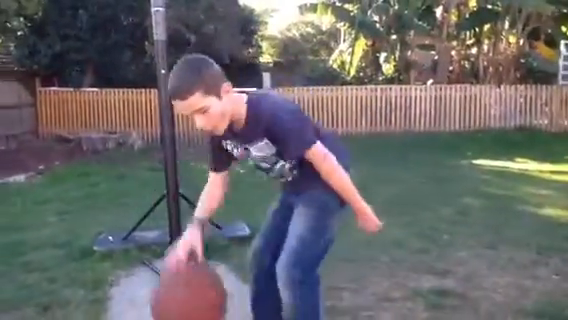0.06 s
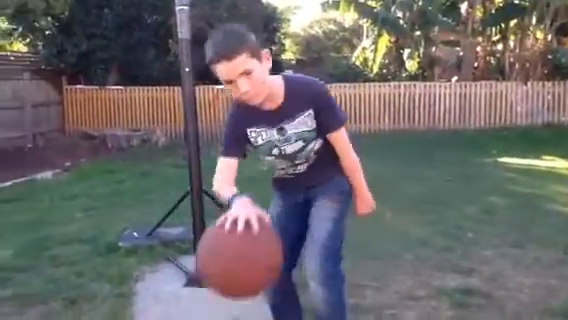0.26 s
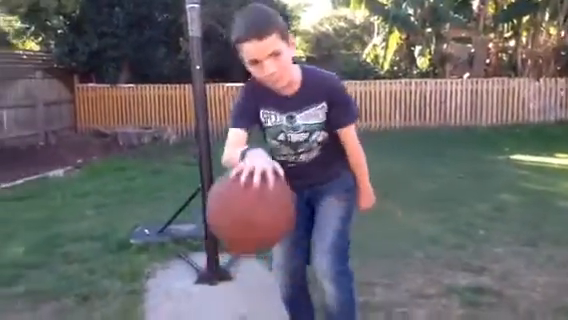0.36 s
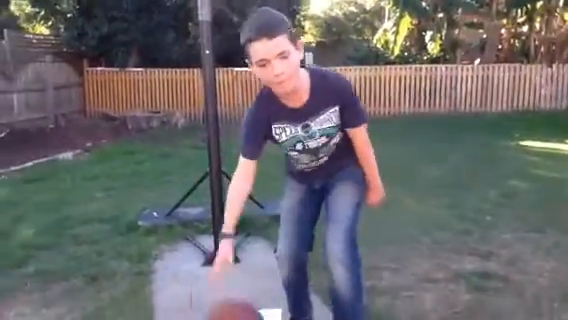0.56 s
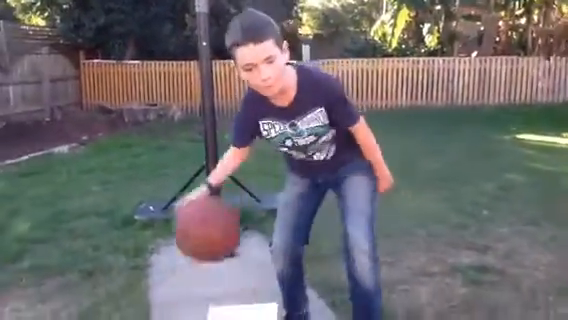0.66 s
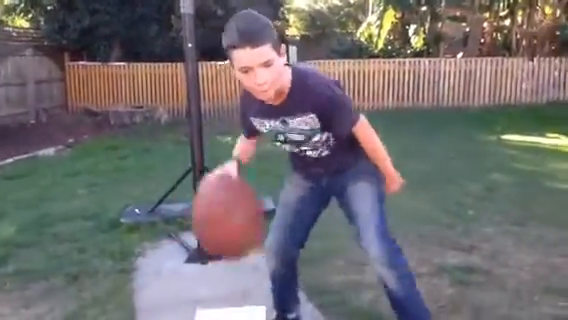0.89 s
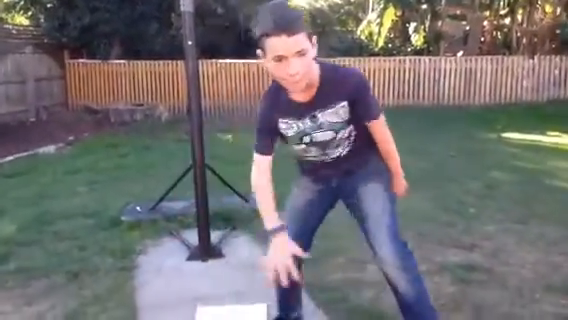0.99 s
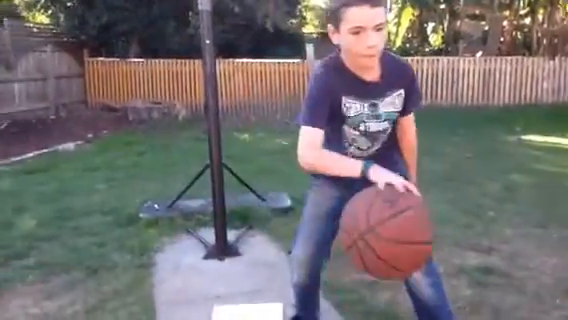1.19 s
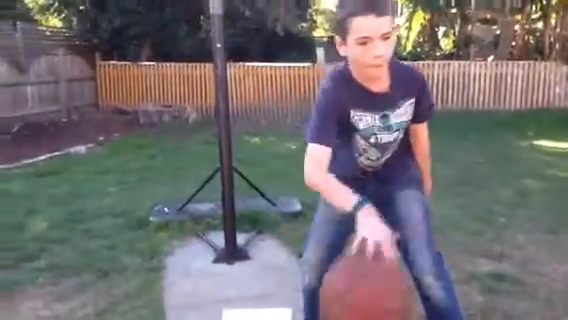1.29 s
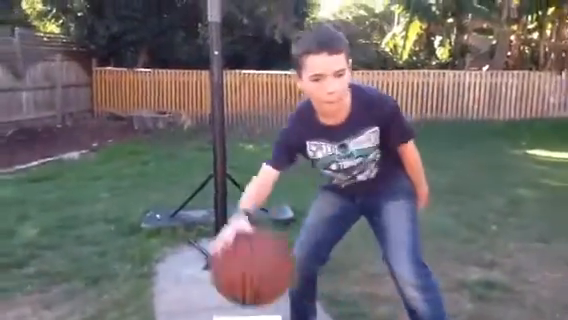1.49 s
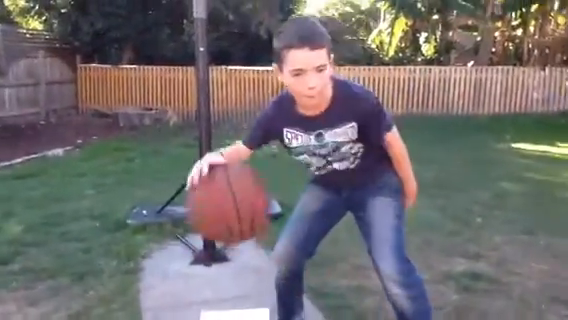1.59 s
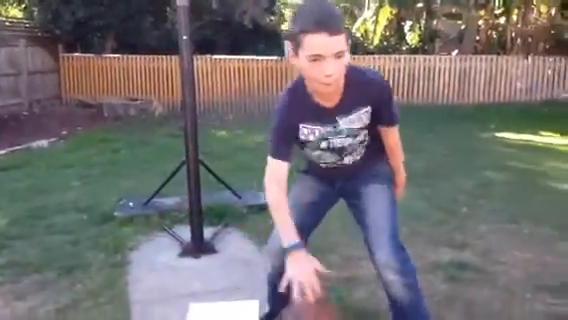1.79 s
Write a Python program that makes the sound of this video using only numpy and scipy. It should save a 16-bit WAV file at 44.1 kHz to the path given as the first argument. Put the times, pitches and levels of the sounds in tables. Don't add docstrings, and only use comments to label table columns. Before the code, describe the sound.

A basketball is dribbled close to the microphone on concrete in a garden, four slapping, hollow bounces under half a second apart, with a soft palm pat before the first and short echoes from fence and house.

```python
import sys
import numpy as np
from scipy import signal
from scipy.fft import rfft, irfft, next_fast_len
from scipy.io import wavfile
from scipy.ndimage import uniform_filter1d, map_coordinates

SR = 44100
rng = np.random.default_rng(int(sys.argv[2]) if len(sys.argv) > 2 else 0)


def log_audio(samples):
    frames = np.atleast_2d(samples).T
    limited = np.clip(frames, -1, 1)
    pcm = np.round(limited * 32767).astype(np.int16)
    wavfile.write(sys.argv[1], SR, pcm)


def gain_from_db(level_db):
    decades = np.asarray(level_db, float) / 20
    return 10 ** decades


N = 81585


def unit(x):
    return x / np.sqrt(np.mean(x ** 2) + 1e-20)


def along(points, hz):
    f, v = np.transpose(points)
    return np.interp(np.log(hz + 1), np.log(f + 1), v)


def wobble(rate_hz):
    knots = rng.standard_normal(int(N * rate_hz / SR) + 4)
    return map_coordinates(knots, [np.arange(N) * rate_hz / SR])


def filtered(x, response):
    m = next_fast_len(N + SR // 2)
    return irfft(rfft(x, m) * response(np.fft.rfftfreq(m, 1 / SR)), m)[:N]


def noise(spectrum):
    return unit(filtered(rng.standard_normal(N), lambda hz: gain_from_db(along(spectrum, hz))))


def after(start_s):
    return np.maximum(np.arange(N) / SR - start_s, 0)


def fade(t, t60_s):
    return (t > 0) * gain_from_db(-60 * t / t60_s)


def ring(t, hz, t60_s):
    return np.sin(2 * np.pi * hz * t) * fade(t, t60_s)


# freq_hz, level_db_per_hz
FLOOR = [(30, -43), (70, -18), (130, -10.5), (300, -2.5), (600, -6), (1300, -8.5), (2200, -16),
         (15500, -23.5)]
FLOOR_DB = -60.5


def traffic():
    return gain_from_db(FLOOR_DB + 1.6 * wobble(3.5)) * noise(FLOOR)


# time_s, level_db
CRICKET = [(0, -84), (.2, -75), (.35, -70), (.58, -74.5), (.72, -62), (.9, -72.5), (1.1, -82.5), (1.5, -72),
           (1.85, -75)]
CRICKET_HZ, CRICKET_WIDTH_HZ, CRICKET_SWING_DB = 2860, 20, 4


def cricket():
    t = np.arange(N) / SR
    level_db = np.interp(t, *np.transpose(CRICKET)) + CRICKET_SWING_DB * wobble(45)
    drift_cycles = np.cumsum(CRICKET_WIDTH_HZ * wobble(40)) / SR
    return np.sqrt(2) * np.sin(2 * np.pi * (CRICKET_HZ * t + drift_cycles)) * gain_from_db(level_db)


# freq_hz, level_db_per_hz
TICK_COLOUR = [(1500, -19), (3000, -6), (7000, -2.5), (13000, -11), (16000, -17)]
# start_s, peak_db, pitch_hz
TICKS = [(.832, -41, 4800), (.850, -55, 4300), (.8995, -53, 4600), (1.555, -51, 8000), (1.5689, -41, 5000),
         (1.7151, -50, 5500)]
TICK_DB, TICK_T60_S, TICK_NOISE = 3, 0.003, 0.8


def ticks():
    out = np.zeros(N)
    for start_s, peak_db, pitch_hz in TICKS:
        t = after(start_s)
        click = ring(t, pitch_hz, TICK_T60_S) + TICK_NOISE * fade(t, TICK_T60_S) * noise(TICK_COLOUR)
        out += gain_from_db(peak_db + TICK_DB) * click
    return out


# start_s, length_s, level_db, centre_hz, width_octaves
RUSTLES = [(.38, 0.24, -61, 940, 2.1), (0.605, 0.044, -54, 780, 2.33), (0.678, 0.074, -62.5, 7100, 1.5),
           (0.901, 0.098, -57, 2700, 2.5), (1.194, 0.045, -71, 14000, 0.6), (1.547, 0.048, -59, 12000, 1.7),
           (1.581, 0.14, -60, 2500, 4.1), (1.285, 0.048, -59, 700, 0.051), (0.454, 0.084, -70, 6600, 1.2)]
SOFTNESS = 0.6


def clothes():
    out = np.zeros(N)
    for start_s, length_s, level_db, hz, octaves in RUSTLES:
        near, far = 2 ** octaves, 8 ** octaves
        band = noise([(hz / far, -54), (hz / near, -6), (hz, 0), (hz * near, -6), (hz * far, -54)])
        progress = np.minimum(after(start_s) / length_s, 1)
        out += gain_from_db(level_db) * np.abs(np.sin(np.pi * progress)) ** SOFTNESS * band
    return out * gain_from_db(1.1 * wobble(59.5))


# freq_hz, level_db_per_hz
BRUSH = [(200, 14.5), (500, 9), (900, 4.5), (2000, 5.5), (4300, 5.5), (7500, -1.5), (15500, -17.5)]
BRUSH_DB, BRUSH_RISE_S, BRUSH_HOLD_S, BRUSH_T60_S = -42.5, 0.0012, 0.0088, 0.062
PAT_S, PAT_DB, PAT_HZ, PAT_T60_S = 0.1312, -29.5, 380, 0.031
PAT_UPPER_HZ, PAT_UPPER_DB = 830, -10


def palm():
    t = after(PAT_S)
    knock = ring(t, PAT_HZ, PAT_T60_S) + gain_from_db(PAT_UPPER_DB) * ring(t, PAT_UPPER_HZ, PAT_T60_S)
    brush = np.minimum(t / BRUSH_RISE_S, 1) * gain_from_db(-60 * after(PAT_S + BRUSH_HOLD_S) / BRUSH_T60_S)
    return gain_from_db(PAT_DB) * knock + gain_from_db(BRUSH_DB) * brush * noise(BRUSH)


# delay_s, level_db
WALLS = [(0.028, -13), (0.037, -12), (0.071, -23), (.108, -28)]
WALL_HZ = 700
# freq_hz, t60_s
YARD = [(100, 1), (200, .6), (500, 0.36), (1000, 0.38), (3000, 0.43), (8000, 0.42)]
# freq_hz, level_db
YARD_COLOUR = [(100, -2.5), (200, -0.5), (300, -2), (600, 8), (1000, 6), (3000, 10), (5000, 10),
               (9000, 0.5)]
YARD_DB, YARD_START_S, YARD_RISE_S, PATCHY_DB = -17, 0.02, 0.012, 1.5


def walls(x, walls_db):
    def response(f):
        echoes = sum(gain_from_db(db + walls_db) * np.exp(-2j * np.pi * f * delay_s) for delay_s, db in WALLS)
        return echoes / (1 + 1j * f / WALL_HZ) ** 1.23
    return filtered(x, response)


def scatter(x, bright_db):
    hz, t, z = signal.stft(rng.standard_normal(SR), SR, nperseg=256)
    colour_db = along(YARD_COLOUR, hz) + bright_db * np.clip(hz / 1500, 0, 1)
    patches = uniform_filter1d(rng.standard_normal(z.shape), size=8, axis=0)
    patches = unit(uniform_filter1d(patches, size=3, axis=1))
    decay_db = -60 * t / along(YARD, hz)[:, None]
    tail = signal.istft(z * gain_from_db(PATCHY_DB * patches + colour_db[:, None] + decay_db), SR, nperseg=256)[1]
    build_up = 1 - np.exp(-after(YARD_START_S)[:len(tail)] / YARD_RISE_S)
    tail = tail * build_up / np.sqrt(SR * 0.036)
    return gain_from_db(YARD_DB) * signal.fftconvolve(x, tail)[:N]


# start_s, level_db, pitch_hz, sign
SLAPS = [
    (0.2086, -0.5, 2130, 1),
    (.6361, -3, 1730, 1),
    (.6380, -2.5, 1803, -1),
    (1.0945, -3, 1670, 1),
    (1.462, -5, 1620, 1),
    (1.4629, -11.5, 1400, -1),
]
SLAP_CYCLES, SPIT_DB, SPIT_T60_S = 0.96, -15.5, 0.018


def slap(start_s, level_db, pitch_hz, sign):
    t = after(start_s)
    pulse = np.sign(sign) * ring(t, pitch_hz, SLAP_CYCLES / pitch_hz * 2) * (1 - np.exp(-t / 0.0001))
    spit = fade(t, SPIT_T60_S) * noise([(500, 8.5), (4000, -10.5), (15000, -24.5)])
    return gain_from_db(level_db + 6) * pulse + gain_from_db(level_db + SPIT_DB) * spit


SHELL_T60_S, LOW_T60_S, CONTACT_S = 0.058, 0.1, 0.011
UPPER_HZ, UPPER_DB, UPPER_T60_S = 473, -18, 0.095


def shell_thud(t, thud_db, shell_hz, low_hz, low_db, rise_s):
    modes = ring(t, shell_hz, SHELL_T60_S) + gain_from_db(low_db) * ring(t, low_hz, LOW_T60_S)
    contact = 0.033 + np.exp(-(t / (CONTACT_S + 0.8 * rise_s)) ** 2)
    upper = gain_from_db(UPPER_DB) * ring(t, UPPER_HZ, UPPER_T60_S)
    return -(gain_from_db(thud_db + 6) * modes * contact + upper) * (1 - np.exp(-t / rise_s))


# pitch_hz, level_db, t60_s
AIR = [(960, -4, .018), (1240, -7, .018), (1460, -5, .018), (1880, -10, .015), (2200, -11, .015),
       (2620, -13, .018), (3250, -13, .02), (3780, -18, .02), (4600, -20, .015)]


def air_ring(t, air_db):
    out = np.zeros(N)
    for (hz, db, t60_s), (a, b) in zip(AIR, rng.standard_normal((len(AIR), 2))):
        out += gain_from_db(air_db + db + 2 * a) * ring(t, hz * (1 + 0.055 * b), t60_s)
    return out * (1 - np.exp(-t / 0.00039))


PEEL_RISE_S, PEEL_T60_S = 0.0023, 0.015


def peel(t, peel_db):
    swell = fade(t, PEEL_T60_S) * (t / PEEL_RISE_S)
    return gain_from_db(peel_db) * swell * noise([(600, 31.5), (2500, 16.5), (15000, -16.5)])


def landing(start_s, thud_db, shell_hz, low_hz, low_db, rise_s, air_db, peel_s, peel_db):
    slaps = [row for row in SLAPS if abs(row[0] - start_s) < 0.02]
    first_s = slaps[0][0]
    out = shell_thud(after(start_s), thud_db, shell_hz, low_hz, low_db, rise_s)
    out += air_ring(after(first_s), air_db)
    for row in slaps:
        out += slap(*row)
    return out + peel(after(first_s + peel_s), peel_db)


# start_s, thud_db, shell_hz, low_mode_hz, low_over_shell_db
LANDINGS = [
    (.2094, -5.5, 259, 177.5, -3),
    (.6386, -9, 245.5, 192, -3),
    (1.0954, -4.5, 257.3, 179, -6),
    (1.4640, -20, 427, 169.4, 11.5),
]
# thud_rise_s, air_db, peel_after_slap_s, peel_db
SKINS = [
    (.0012, -16, 0.0065, -15),
    (.0012, -24, 0.00585, -13),
    (.0012, -16.5, .0075, -12),
    (.005, -15.5, 0.0053, -15.5),
]
# walls_db, bright_scatter_db, shell_tone_away_from_mic_db
ANSWERS = [
    (-3, -5.5, -21),
    (-3.5, -3.5, -13.5),
    (-1, -2, -30),
    (0, -1, -9.5),
    (-8, -0.5, -77),
]
AWAY_HZ, AWAY_T60_S = 288.6, 0.051
MIC_LOW_HZ = 119


def scene():
    hits = [landing(*row, *skin) for row, skin in zip(LANDINGS, SKINS)] + [palm()]
    starts_s = [row[0] for row in LANDINGS] + [PAT_S]
    ball = np.zeros(N)
    for hit, start_s, (walls_db, bright_db, away_db) in zip(hits, starts_s, ANSWERS):
        sent = hit + gain_from_db(away_db) * ring(after(start_s), AWAY_HZ, AWAY_T60_S)
        ball += hit + walls(sent, walls_db) + scatter(sent, bright_db)
    ball = filtered(ball, lambda f: (1j * f / (MIC_LOW_HZ + 1j * f)) ** 3)
    return (ball + ticks() + clothes() + cricket() + traffic())[None]


def band_limit(x):
    return signal.sosfilt(signal.butter(12, 16580, fs=SR, output="sos"), x)


TOP_HZ, ABOVE_DB, END_HZ = 15400, -19, 16600


def record(dry):
    mix = filtered(dry[0], lambda f: np.where(f < TOP_HZ, 1, gain_from_db(ABOVE_DB)) * (f < END_HZ))[None]
    return band_limit(mix)


dry = scene()
out = record(dry)
log_audio(out)
```